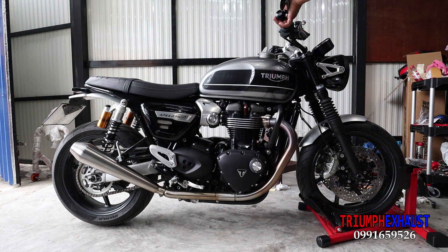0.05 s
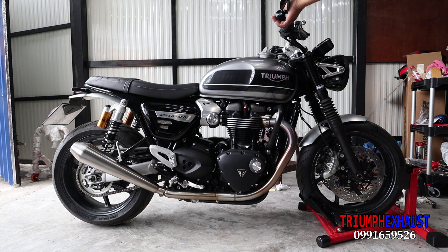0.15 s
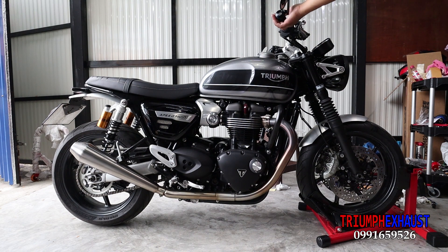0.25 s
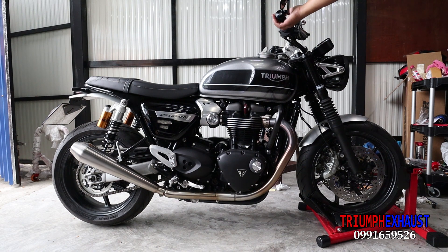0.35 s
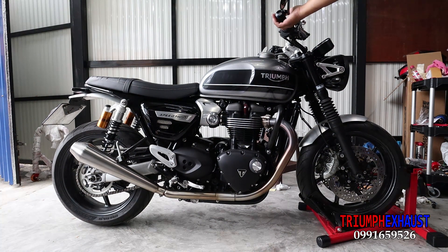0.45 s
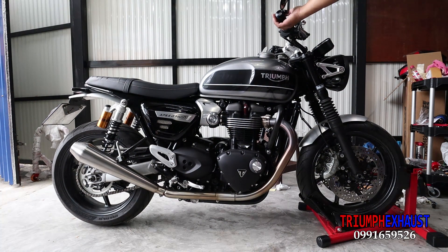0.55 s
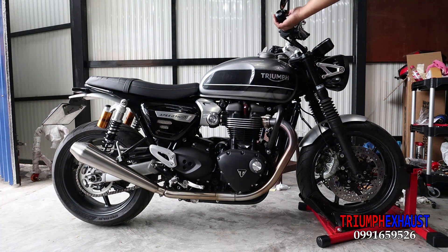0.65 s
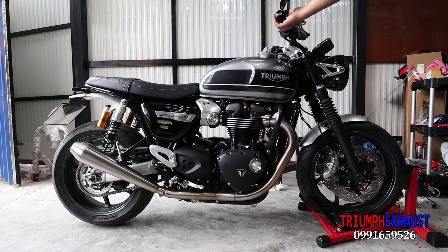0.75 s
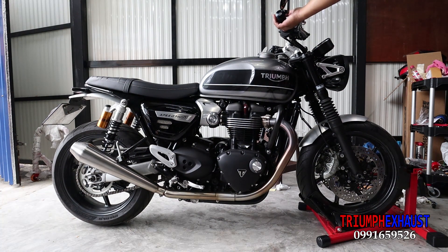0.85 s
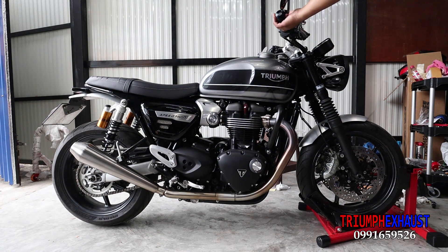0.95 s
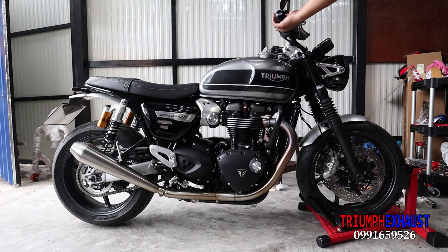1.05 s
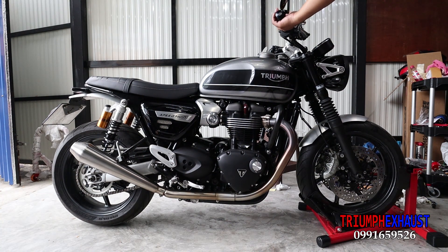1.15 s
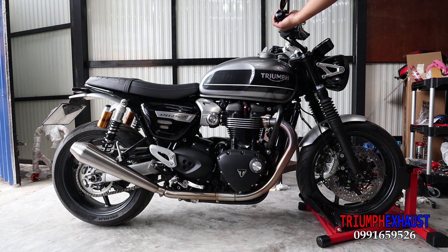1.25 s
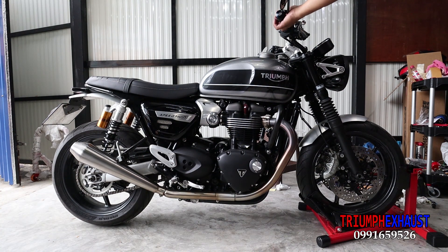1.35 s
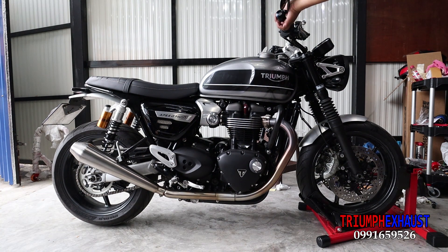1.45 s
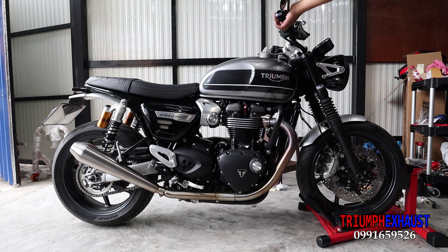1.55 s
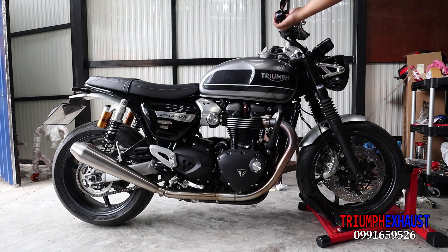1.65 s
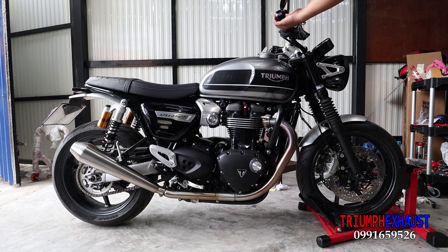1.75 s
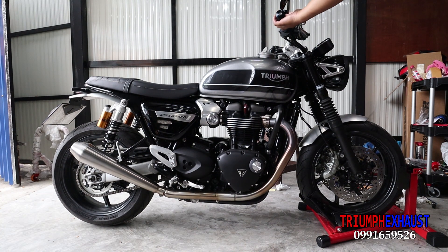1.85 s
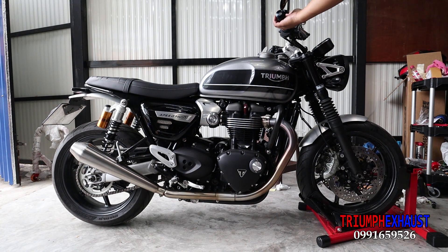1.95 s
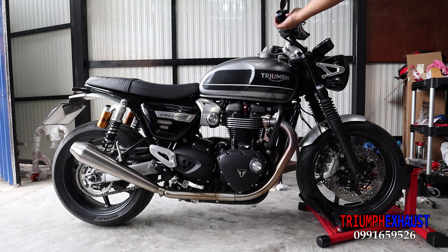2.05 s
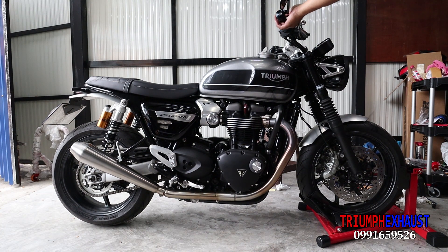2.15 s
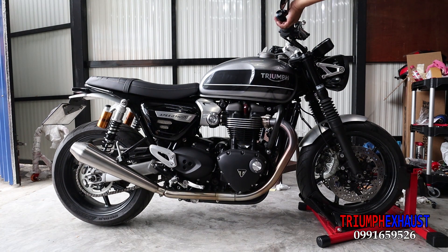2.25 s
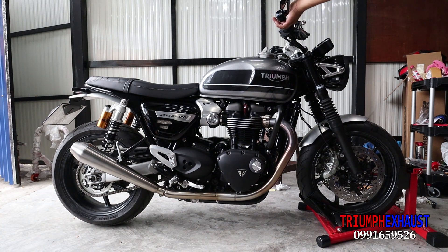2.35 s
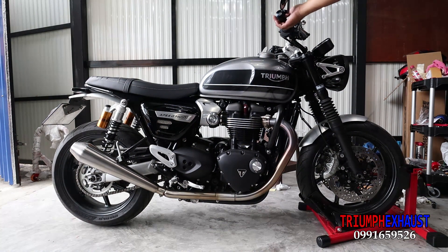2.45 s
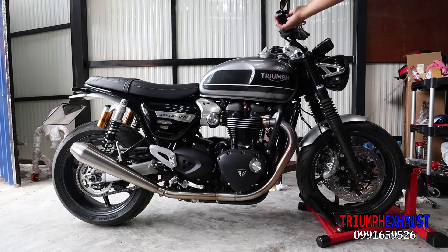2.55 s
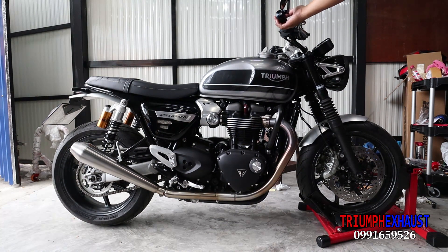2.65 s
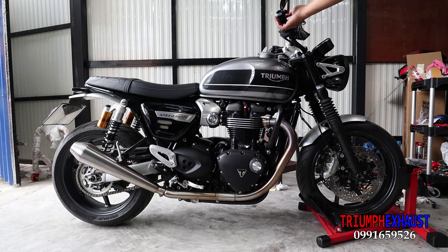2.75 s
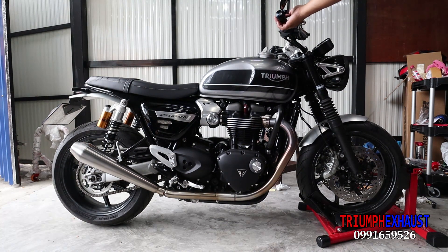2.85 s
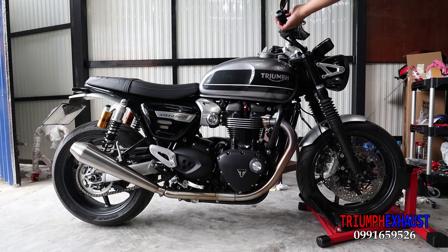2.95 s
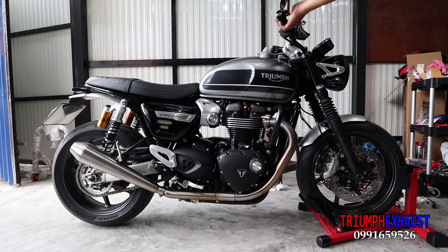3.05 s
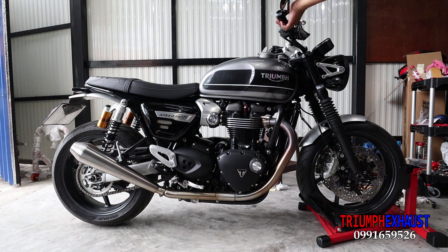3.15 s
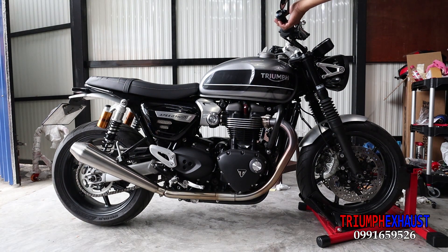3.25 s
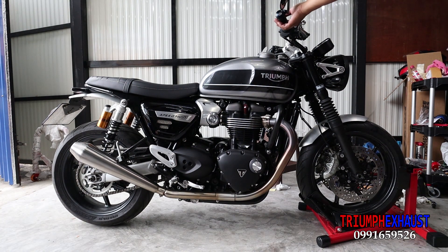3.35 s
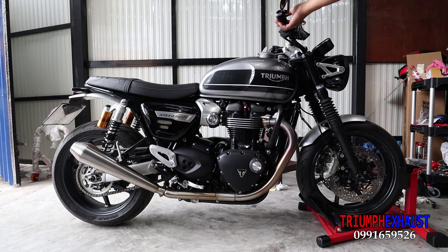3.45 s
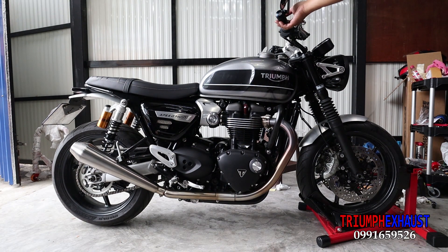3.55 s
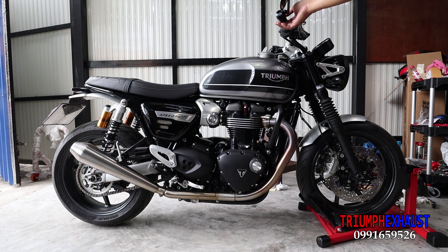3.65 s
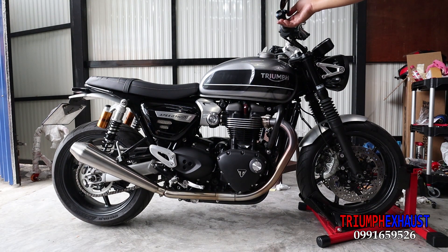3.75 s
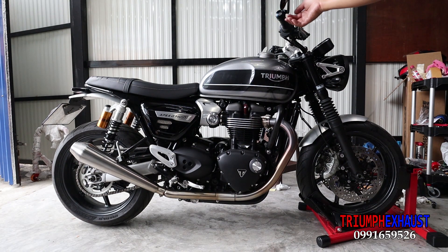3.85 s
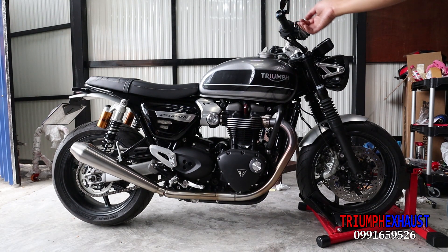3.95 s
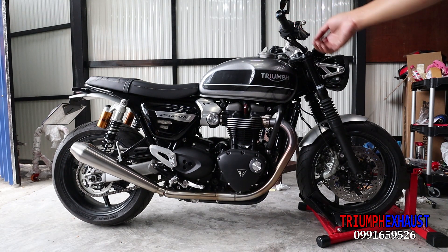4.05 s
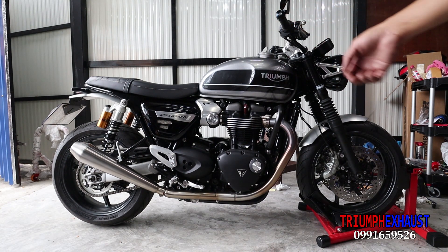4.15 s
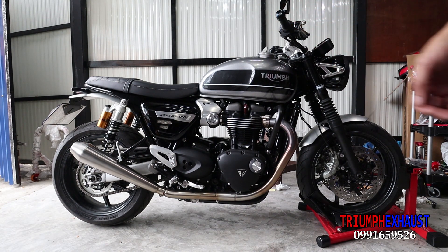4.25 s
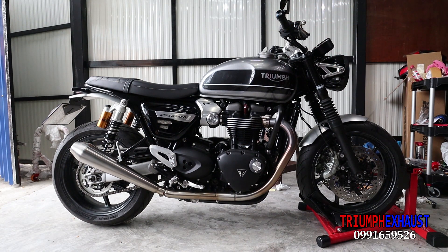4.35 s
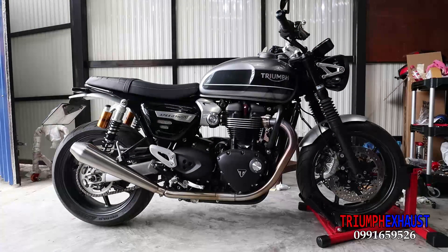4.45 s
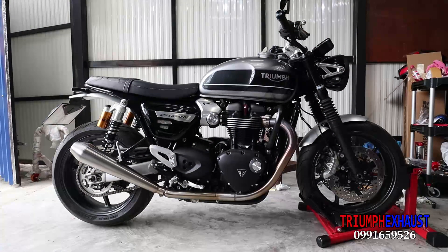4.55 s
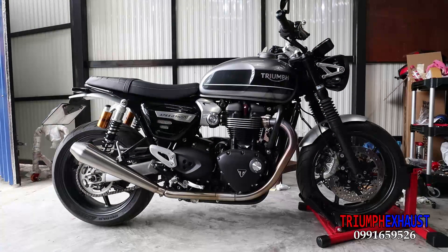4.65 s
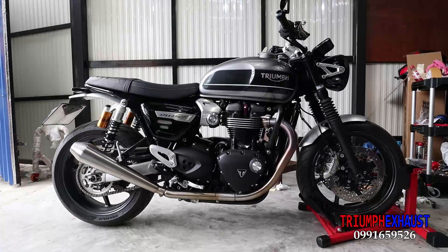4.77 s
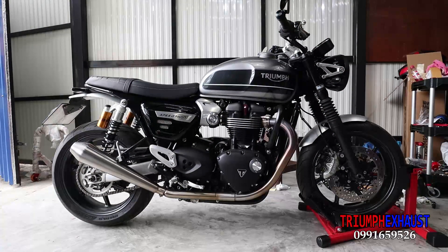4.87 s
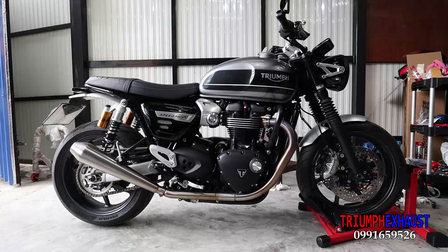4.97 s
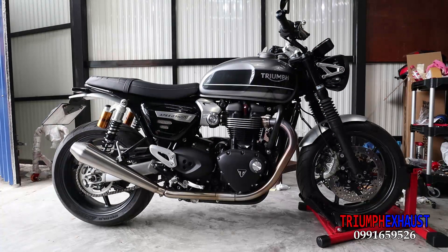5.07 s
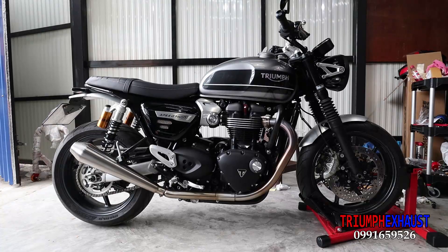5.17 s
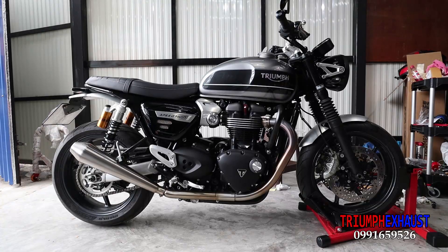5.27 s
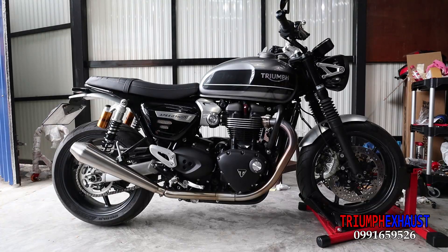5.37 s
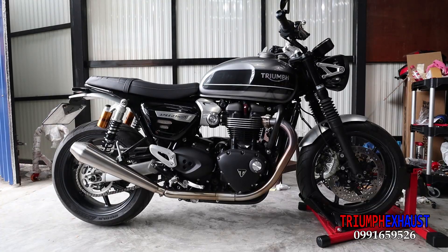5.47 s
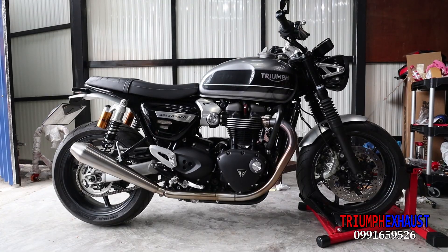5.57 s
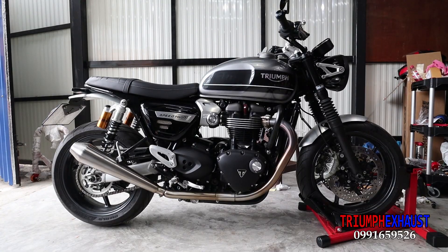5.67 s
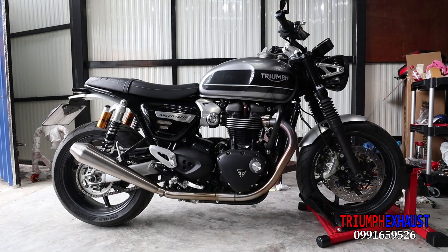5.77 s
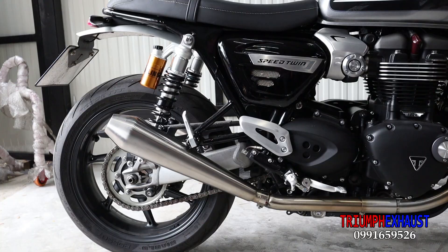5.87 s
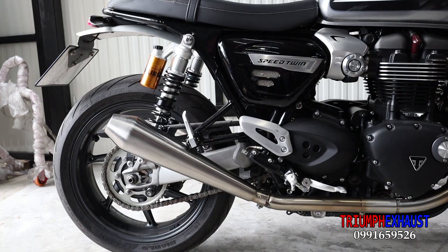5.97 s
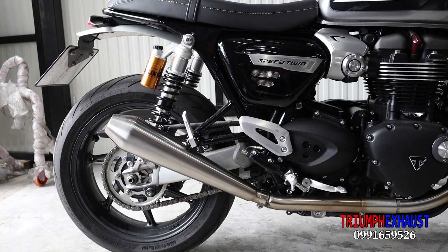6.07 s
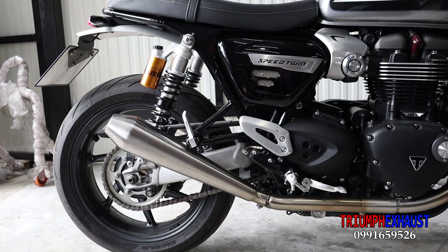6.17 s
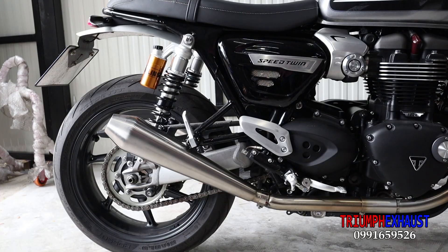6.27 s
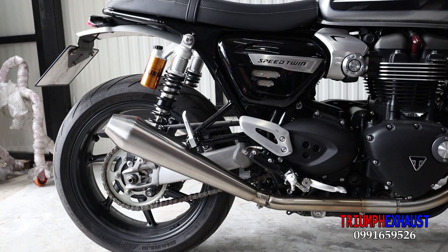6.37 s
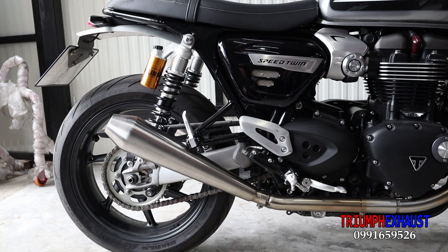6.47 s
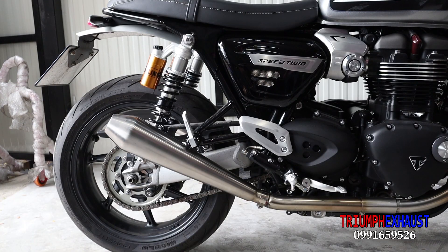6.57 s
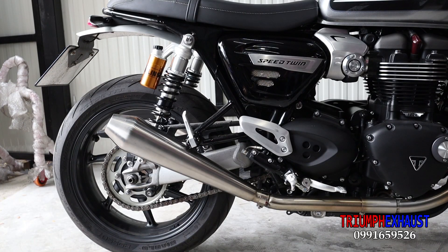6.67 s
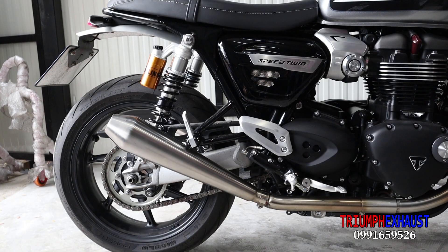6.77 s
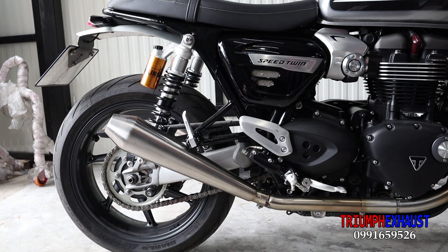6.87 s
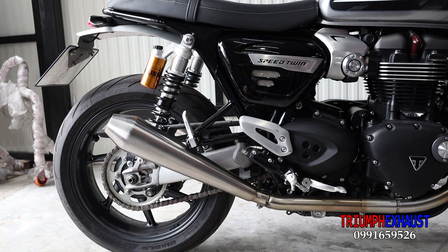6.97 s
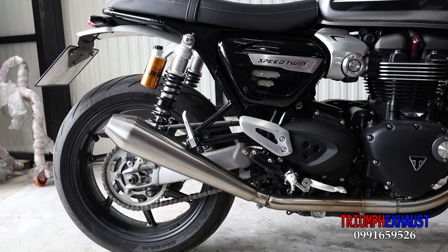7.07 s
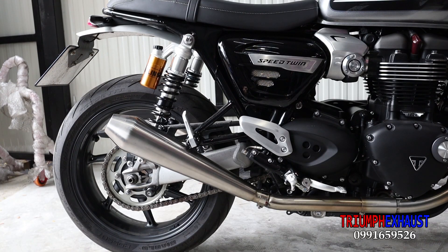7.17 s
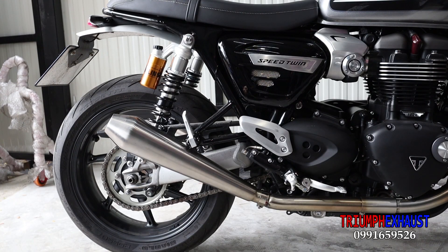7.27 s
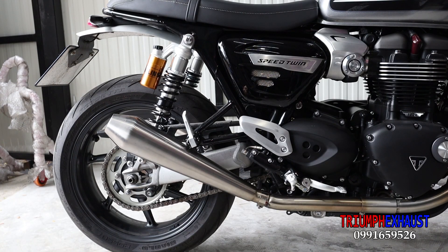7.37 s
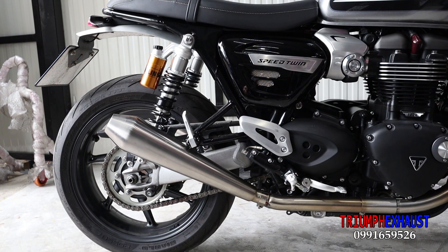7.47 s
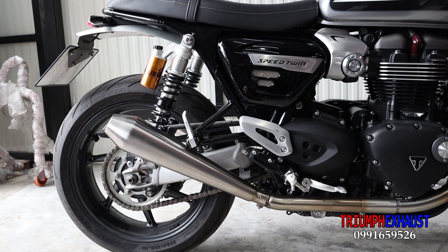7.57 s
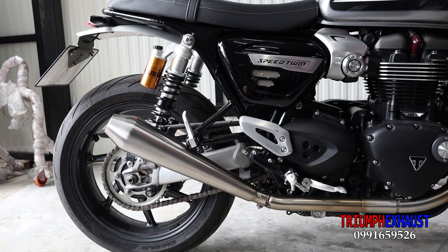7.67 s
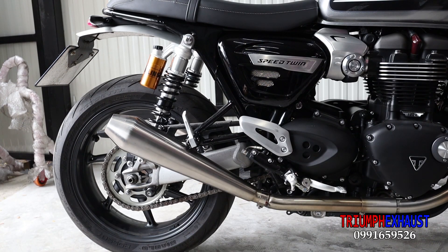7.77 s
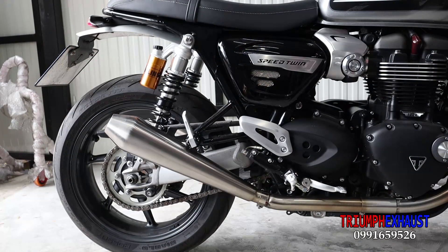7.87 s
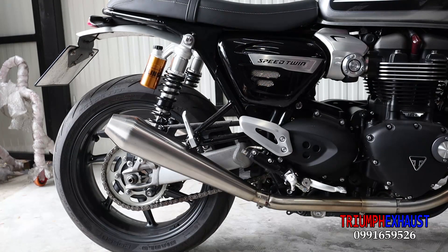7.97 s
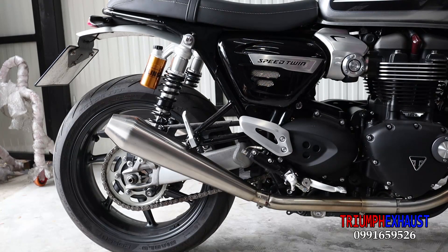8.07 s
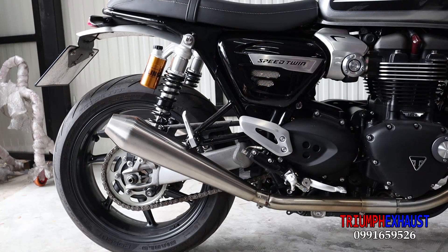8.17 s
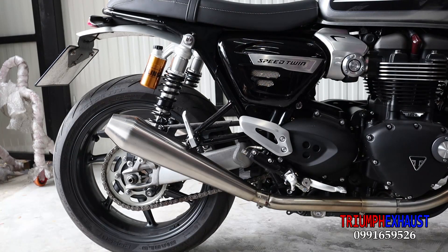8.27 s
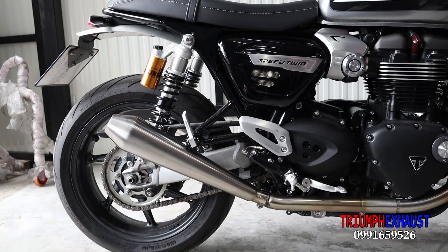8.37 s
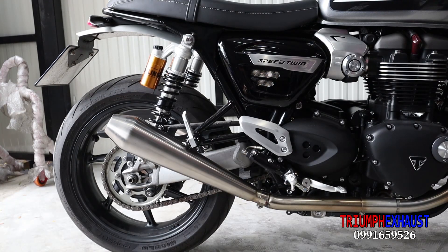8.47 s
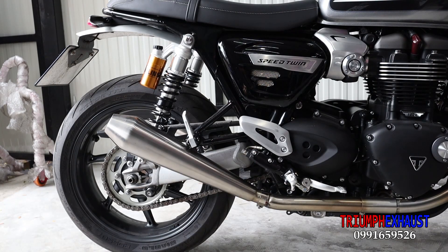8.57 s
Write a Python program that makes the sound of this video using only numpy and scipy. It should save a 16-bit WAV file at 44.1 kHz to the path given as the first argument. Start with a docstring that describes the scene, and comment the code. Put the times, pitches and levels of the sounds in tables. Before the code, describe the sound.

A twin-cylinder motorcycle is revved in quick blips with exhaust pops, settles to a lumpy idle, then gets one more harsh blip.

```python
"""A twin-cylinder motorcycle with a 270 degree crank is blipped four times in a workshop. Its uneven
firings ring the exhaust, unburnt fuel pops as the revs fall, and the valve gear clatters throughout.
From about 4 s it settles to a lumpy idle and the thin whine of the throttle servo creeps in.
At 5.8 s the sound cuts out for an instant and resumes louder, closer to the silencer, still idling.
At 7.7 s comes a fifth, harsher blip, with two last pops on the way down."""
import sys
import numpy as np
from scipy import signal
from scipy.fft import rfft, irfft
from scipy.io import wavfile
from scipy.ndimage import uniform_filter1d

SR = 44100
rng = np.random.default_rng(int(sys.argv[2]) if len(sys.argv) > 2 else 0)


def wav_record(signal):
    """Record a signal, one row per channel, as 16-bit PCM in the file named by sys.argv[1]."""
    frames = np.transpose(np.atleast_2d(signal))
    bounded = np.clip(frames, -1, 1)
    # unit amplitude maps onto the largest positive 16-bit level
    quanta = np.round(bounded * 32767).astype(np.int16)
    wavfile.write(sys.argv[1], SR, quanta)


N = 380141
TIME = np.arange(N) / SR

# throttle blips: open_s, shut_s, peak_s, peak_rpm, harshness_db
THROTTLE_BLIPS = [(-0.026, 0.25, 0.297, 4689, -8), (1.538, 1.675, 1.760, 2896, -1),
                  (2.305, 2.455, 2.545, 3139, 0), (3.221, 3.350, 3.447, 3036, .5),
                  (7.710, 7.915, 7.994, 3503, 3)]
# the idle hunts a little: time_s, speed_rpm
IDLE_SPEED = [(4.3, 1124), (5.3, 1094), (5.55, 994), (5.9, 1036), (6.25, 915), (6.5, 1022), (7.3, 1037),
              (7.6, 1004)]
# full-load mix, a row each for boom, bark, hiss, crack: level_db, load_exponent, db_per_harshness_db
LOAD_MIX = [(-9.5, 0.53, 0.64), (-18, 1.56, 0.64), (-32, 0.97, 1.2), (-5, 0.95, 1.26)]
# mix with the throttle shut: speed_rpm, thump_db, boom_db, clatter_db, hiss_db
SHUT_MIX = [(970, -20.5, -11.5, -26, -43.5), (1540, -16.5, -9, -27.5, -40), (2200, -11, -14.5, -24, -38),
            (2930, -13.5, -6.5, -20, -36), (4680, -24, -3.5, -15, -39)]
# fader on that mix, stepping up where the silencer is closer: time_s, gain_db
SHUT_FADER = [(0, -10.5), (.55, -9), (.75, -14.5), (1.45, -15), (1.8, -11.5), (3.15, -11.5), (3.6, -10.5),
              (4.35, -11), (5.0, -6.5), (5.83, -5), (5.89, 0.5), (7.7, -.5), (8.1, -4.5), (8.62, -4.5)]
# afterfire as the revs fall: start_s, crack_db, boom_db, cutoff_hz
AFTERFIRE_POPS = [(0.5962, 1.5, -8.5, 2510), (0.6151, 2.5, -20, 2580), (0.9073, -7.5, -24, 1030),
                  (1.9797, -10, -7, 900), (2.211, -8.5, -9, 900), (2.949, -19, -16.5, 800),
                  (3.7360, -13, -7.5, 870), (4.195, -20.5, -24, 800), (8.2987, -8.5, -3.5, 850),
                  (8.576, -4.5, -1, 970)]

# low swell of pumped gas: frequency_hz, relative_db
THUMP_EQ = [(15, -38), (30, 1), (42, 1), (55, 18), (72, 17.5), (90, 6.5), (130, -4), (300, -54)]
# the pipe's main resonance at idle: frequency_hz, relative_db
BOOM_EQ = [(25, -46), (60, -4.5), (86, -7.5), (105, -4), (122, 1), (148, 2), (175, -5.5), (205, -24),
           (235, -23), (265, -19), (320, -29.5), (400, -55), (900, -43)]
# the same resonance when coasting: frequency_hz, relative_db
COAST_BOOM_EQ = [(25, -10), (60, -47), (86, -19), (105, -4.5), (120, 4.5), (148, 1), (180, -6.5),
                 (210, -21.5), (265, -19), (320, -23), (400, -29), (900, -52)]
# the same under load, with hotter gas and steeper pulses: frequency_hz, relative_db
LOAD_BOOM_EQ = [(25, -34.5), (60, -24.5), (90, -11), (125, 1.5), (155, 5.5), (180, -3.5), (220, -12),
                (265, -9), (320, -13), (400, -30.5), (900, -53)]
# steep front of a firing: frequency_hz, relative_db
BARK_EQ = [(100, -31.5), (180, 5), (270, 10), (330, 6.5), (420, -1), (600, 1.5), (850, -2), (1500, -7),
           (2500, -14.5), (6000, -58)]
# shock front: frequency_hz, relative_db
CRACK_EQ = [(80, -18), (200, 2), (300, 0.5), (700, -0.5), (1400, 1.5), (2000, -4.5), (3000, -14),
            (7000, -16.5), (15000, -57)]
# hiss of the gas jet, also the colour of the bright ticks: frequency_hz, relative_db
JET_EQ = [(1000, -31), (3000, 4), (4500, 2.5), (5600, 0.5), (7000, 1), (8700, 0.5), (10700, -6),
          (12000, -12), (15500, -29)]
# upper modes of the exhaust pipe: pitch_hz, width_hz, level_db
PIPE_RINGS = [(270, 26, 1), (406, 20, -4), (503, 24, -5), (549, 26, -5), (862, 60, -8)]

# valves seating: cycle_fraction, relative_db
VALVE_HITS = [(.17, 3), (.36, -8), (.65, -3), (0.809, -2)]
# engine cases struck by the valve gear at idle: frequency_hz, relative_db
IDLE_CASE_EQ = [(150, -24.5), (350, -3), (460, -2.5), (570, -5), (860, -0.5), (980, -2.5), (1120, 1),
                (1230, -3.5), (1450, 1.5), (1800, -0.5), (2250, -7), (3200, -7), (4150, -10.5),
                (4700, -20.5), (9000, -34), (15000, -40.5)]
# the same cases at speed: frequency_hz, relative_db
FAST_CASE_EQ = [(150, 11), (400, 2.5), (700, -1.5), (1000, -3), (1300, 2.5), (1600, 1.5), (2100, -6),
                (2500, -5), (3000, -9), (3900, -6.5), (4500, -16), (9000, -24.5)]
# whine of the throttle servo holding idle: time_s, level_db
WHINE_FADER = [(0, -56), (2.8, -54), (3.9, -49), (5, -46), (5.83, -39.5), (5.9, -35), (7.7, -35),
               (7.8, -44), (8.62, -41)]
# overtones of the whine: harmonic_number, relative_db
WHINE_HARMONICS = [(1, 0), (2, -13), (3, -12), (4, -13), (5, -24)]

SECOND_FIRING = 270 / 720  # fraction of a cycle after the first
START_CYCLE, SKIPPED_CYCLES = .97, .4
DROPOUT_START_S, DROPOUT_END_S = 5.842, 5.879


def exhaust(cycle, rpm, thump, boom, load_boom, bark, hiss):
    """Two uneven firings a cycle ring the pipe; returns the deep note and its barking, hissing edge."""
    firings = level_across_revs(strokes(cycle, (0, SECOND_FIRING), (0, 1), scatter_db=1.34), rpm)
    # falling revs blend in the coasting tone
    fall_rpm_per_s = uniform_filter1d(-np.gradient(rpm) * SR, SR // 20)
    coast = np.clip(fall_rpm_per_s / 1000, 0, 1) * np.clip((rpm - 1300) / 600, 0, 1)
    booms = firings * boom * boom / np.hypot(boom, load_boom)  # ducks under the loaded boom
    deep = ring(booms * (1 - coast), response(BOOM_EQ))
    deep += ring(booms * coast, response(COAST_BOOM_EQ))
    deep += ring(firings * load_boom, response(LOAD_BOOM_EQ))
    deep += ring(firings * thump, response(THUMP_EQ))
    # the front of each pulse varies more than its body, and drags turbulence behind it
    fronts = level_across_revs(strokes(cycle, (0, SECOND_FIRING), (0, 0), scatter_db=1.5), rpm)
    blast = 0.78 * fronts + 0.99 * puffs(fronts, decay_s=0.017)
    edge = ring(pipe(blast * bark), response(BARK_EQ))
    # under load the gas leaves in distinct spits, otherwise as an even rush
    spitting = np.clip(bark / undb(-33), 0.15, .85)
    spits = np.sqrt(spitting) * puffs(fronts, decay_s=0.02)
    rush = np.sqrt(1 - spitting) * rng.standard_normal(N)
    return deep, edge + ring((spits + rush) * hiss, response(JET_EQ))


def pipe(fronts):
    """The pipe's upper modes ring on behind each pressure front."""
    return fronts + sum(undb(db) * signal.lfilter(*signal.iirpeak(hz, hz / width_hz, SR), fronts)
                        for hz, width_hz, db in PIPE_RINGS)


def crank_speed(start_rpm=2065.0, climb_exponent=.93, friction_rpm_per_s=1477.4, drag_s=2.591):
    """Each blip pulls the revs up to its peak; friction and drag bring them back down to idle."""
    idle, rpm = automation(IDLE_SPEED), np.full(N, start_rpm)
    friction_rpm = friction_rpm_per_s * drag_s
    for open_s, _, peak_s, peak_rpm, _ in THROTTLE_BLIPS:
        from_rpm = np.interp(open_s, TIME, rpm)
        progress = np.clip((TIME - open_s) / (peak_s - open_s), 0, 1)
        climb = from_rpm + (peak_rpm - from_rpm) * progress ** climb_exponent
        fall = (peak_rpm + friction_rpm) * np.exp(-(TIME - peak_s) / drag_s) - friction_rpm
        rpm = np.select([TIME < open_s, TIME < peak_s], [rpm, climb], np.maximum(fall, idle))
    return rpm


def on_throttle(attack_share=0.74, release_s=0.02):
    """Gains of boom, bark, hiss and crack: load builds as the throttle opens, holds, dies as it shuts."""
    full_db, exponent, harshness_share = np.transpose(LOAD_MIX)[:, :, None]
    gains = np.zeros((len(LOAD_MIX), N))
    for open_s, shut_s, _, _, harshness_db in THROTTLE_BLIPS:
        on = (TIME > open_s) & (TIME < shut_s + 10 * release_s)
        attack = np.minimum((TIME[on] - open_s) / (attack_share * (shut_s - open_s)), 1)
        load = attack * np.exp(-np.maximum(TIME[on] - shut_s, 0) / release_s)
        gains[:, on] += undb(full_db + harshness_share * harshness_db) * load ** exponent
    return gains


def off_throttle(rpm):
    """Gains of thump, boom, clatter and hiss: the bed under the blips, riding the revs and the fader."""
    speeds_rpm, *layers_db = np.transpose(SHUT_MIX)
    fader_db = automation(SHUT_FADER)
    return [undb(np.interp(rpm, speeds_rpm, db) + fader_db) for db in layers_db]


def hard_firings(cycle, gain):
    """At full load each firing steepens into a bright crack."""
    firings = strokes(cycle, (0, SECOND_FIRING), (0, 0), scatter_db=5)
    return shock(gain * firings, cutoff_hz=11000, spit_s=0.0053, spit_db=-21)


def afterfire(size=4096):
    """Unburnt fuel goes off in the pipe; returns the booms and their shock fronts."""
    deep, sharp = np.zeros(N + size), np.zeros(N + size)
    boom = response(BOOM_EQ)
    for start_s, crack_db, boom_db, cutoff_hz in AFTERFIRE_POPS:
        at = int(start_s * SR)
        front = shock(signal.unit_impulse(size), cutoff_hz, spit_s=0.0048, spit_db=-20)
        sharp[at:at + size] += undb(crack_db) * front / np.abs(front).max()
        deep[at:at + size] += undb(boom_db) * boom / np.abs(boom).max()
    return deep[:N], sharp[:N]


def shock(impulses, cutoff_hz, spit_s, spit_db):
    """A shock front with a spit of gas at each impulse; an impulse of 1 peaks near 1."""
    crack = signal.sosfilt(signal.butter(2, cutoff_hz, fs=SR, output="sos"), response(CRACK_EQ))
    spit = undb(spit_db) * fade(impulses, spit_s) * rng.standard_normal(len(impulses))
    peak = np.abs(crack).max() + undb(spit_db) * np.linalg.norm(crack)
    return -ring(impulses + spit, crack) / peak


def valve_gear(cycle, rpm, gain):
    """Valves seat four times a cycle, and chain and gears add dense ticks; all ring the engine cases."""
    valves = level_across_revs(strokes(cycle, *np.transpose(VALVE_HITS), scatter_db=3), rpm)
    ticks_per_s = rpm / 2
    chain = (rng.random(N) < ticks_per_s / SR) * rng.standard_normal(N)
    knocks = unit(puffs(valves, decay_s=0.021) + 0.57 * unit(chain) + 0.83 * rng.standard_normal(N))
    # the same teeth and links meet on every turn of the crank, so at speed the clatter sings
    teeth = np.interp(2 * cycle % 1, np.linspace(0, 1, 256), rng.standard_normal(256))
    whirr = unit(knocks + 0.55 * unit(teeth))
    fast = np.clip((rpm - 1300) / 900, 0, 1)
    cases = ring(knocks * gain * np.sqrt(1 - fast), response(IDLE_CASE_EQ))
    cases += ring(whirr * gain * np.sqrt(fast), response(FAST_CASE_EQ))
    # a light, bright tick from each cylinder sits on top
    ticks = level_across_revs(strokes(cycle, (.32, .65), (0, 0), scatter_db=4), rpm)
    bright = puffs(ticks, decay_s=0.0097) * gain * undb(-22)
    return cases + ring(bright, response(JET_EQ))


def servo(cycle, pitch_hz=1060.1, flutter_db=1.0, shake_db=0.5):
    """The throttle servo's thin, steady whine, fluttering as the engine shakes it."""
    flutter = unit(ring(rng.standard_normal(N), np.hanning(SR // 20)))
    tone = sum(undb(db) * np.sin(2 * np.pi * k * pitch_hz * TIME) for k, db in WHINE_HARMONICS)
    level_db = automation(WHINE_FADER) + flutter_db * flutter + shake_db * np.sin(2 * np.pi * cycle)
    return np.sqrt(2) * tone * undb(level_db)


def workshop(send, t60_s=0.41, predelay_s=0.0049):
    """A short, diffuse wash off sheet-metal walls and a concrete floor."""
    t = np.arange(SR * 3 // 4) / SR
    tail = rng.standard_normal(len(t)) * np.exp(-np.log(1000) * t / t60_s) * (t > predelay_s)
    band = signal.butter(1, (220, 6000), "bandpass", fs=SR, output="sos")
    return ring(send, signal.sosfilt(band, tail / np.linalg.norm(tail)))


def strokes(cycle, cycle_fractions, levels_db, scatter_db):
    """Impulses at set points of the engine cycle, each of its own strength."""
    impulses = np.zeros(N)
    for fraction, db in zip(cycle_fractions, levels_db):
        at = np.flatnonzero(np.diff(np.floor(cycle - fraction)) > 0)
        impulses[at] += undb(db + scatter_db * rng.standard_normal(len(at)))
    return impulses


def level_across_revs(impulses, rpm):
    """Hold a train of strokes at mean power 1 at every speed."""
    return unit(impulses / np.sqrt(rpm))


def puffs(impulses, decay_s):
    """A short burst of noise after each impulse; mean power 1."""
    return unit(fade(impulses, decay_s) * rng.standard_normal(N))


def fade(impulses, decay_s):
    """Give each impulse an exponential tail."""
    return signal.lfilter([1], [1, -np.exp(-1 / (decay_s * SR))], impulses)


def response(eq, size=8192):
    """An EQ curve as an impulse response of unit energy, rolling off above the last point."""
    hz, db = np.transpose(eq)
    grid_hz = np.maximum(np.arange(size // 2 + 1) * SR / size, 1)
    rolloff = np.minimum(hz[-1] / grid_hz, 1) ** 2
    gain = undb(np.interp(np.log(grid_hz), np.log(hz), db)) * rolloff
    # minimum phase keeps the attack at the very front
    cepstrum = irfft(np.log(gain))
    cepstrum[1:size // 2] *= 2
    cepstrum[size // 2 + 1:] = 0
    impulse_response = irfft(np.exp(rfft(cepstrum)))[:size // 2]
    return impulse_response / np.linalg.norm(impulse_response)


def ring(x, impulse_response):
    """Pass a sound through an impulse response."""
    return signal.fftconvolve(x, impulse_response)[:len(x)]


def automation(table):
    """Join rows of time_s, value with straight ramps."""
    return np.interp(TIME, *np.transpose(table))


def undb(db):
    """Decibels to gain."""
    return 10 ** (np.asarray(db) / 20)


def unit(x):
    """Scale to rms 1."""
    return x / np.sqrt(np.mean(x ** 2))


def scene():
    """Exhaust and pops up front; clatter, servo whine and the workshop behind."""
    rpm = crank_speed()
    thump, boom, clatter, hiss = off_throttle(rpm)
    load_boom, load_bark, load_hiss, load_crack = on_throttle()
    # a four-stroke cycle takes two turns of the crank; the phase slips ahead during the dropout
    skipped = SKIPPED_CYCLES * np.interp(TIME, (DROPOUT_START_S, DROPOUT_END_S), (0, 1))
    cycle = START_CYCLE + np.cumsum(rpm) / (2 * 60 * SR) + skipped
    idle_bark = undb(-34.5) * boom
    rev_boost = undb(5 * np.log2(rpm / 3000))  # 5 dB more loaded bark per octave of revs
    bark = np.hypot(idle_bark, load_bark * rev_boost)
    deep, edge = exhaust(cycle, rpm, thump, boom, load_boom, bark, np.hypot(hiss, load_hiss))
    pop_boom, pop_crack = afterfire()
    deep += pop_boom
    cracks = pipe(pop_crack + hard_firings(cycle, load_crack))
    sharp = edge + valve_gear(cycle, rpm, clatter)
    slapback = undb(-15) * np.interp(TIME - .0265, TIME, deep, left=0)  # bass off the nearest wall
    room = workshop(undb(-7) * sharp + undb(-3.5) * cracks + undb(-9) * deep)
    return (deep + slapback + sharp + cracks + room + servo(cycle))[None]


def record(dry, low_cut_hz=24, high_cut_hz=15900):
    """The deepest bass is cut, the sound drops out briefly, the loudest peaks clip and the top is cut."""
    gate = (TIME < DROPOUT_START_S) | (TIME > DROPOUT_END_S)
    trimmed = signal.sosfilt(signal.butter(2, low_cut_hz, "highpass", fs=SR, output="sos"), dry)
    clipped = np.clip(trimmed * gate, -1, 1)
    return signal.sosfilt(signal.ellip(8, .2, 70, high_cut_hz, fs=SR, output="sos"), clipped)


dry = scene()
out = record(dry)
wav_record(out)
```